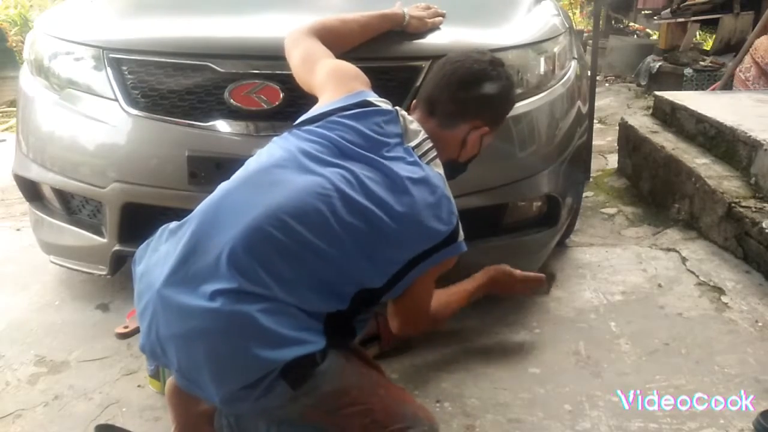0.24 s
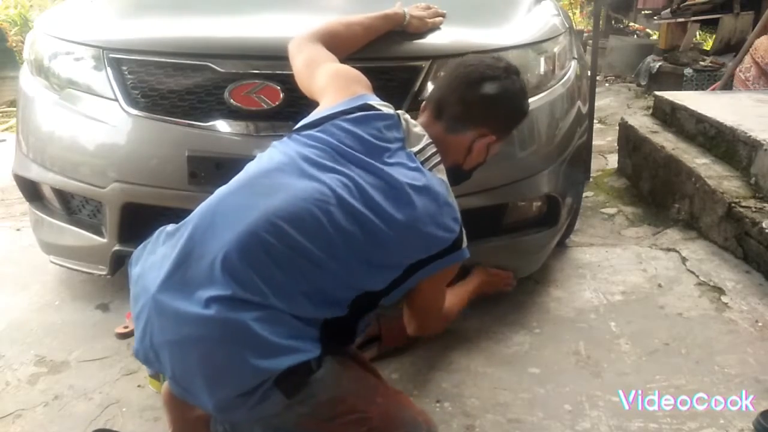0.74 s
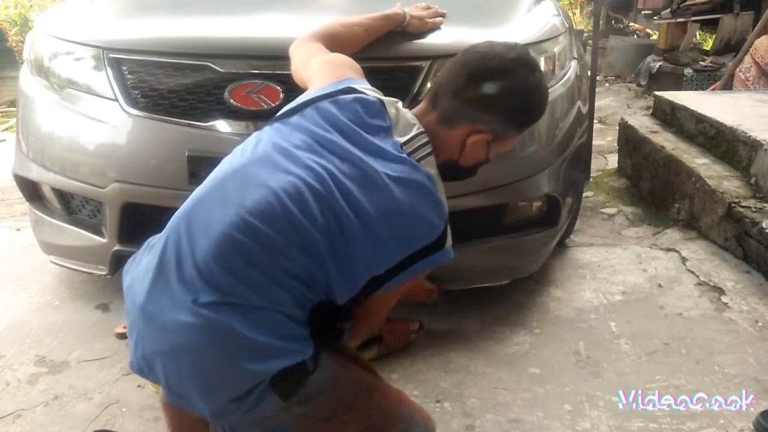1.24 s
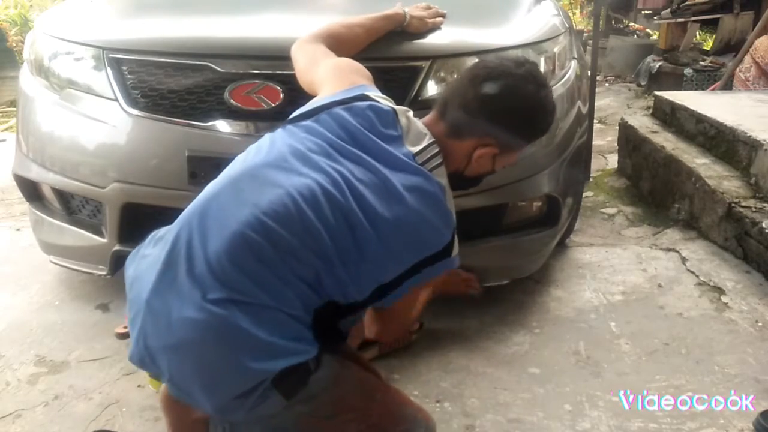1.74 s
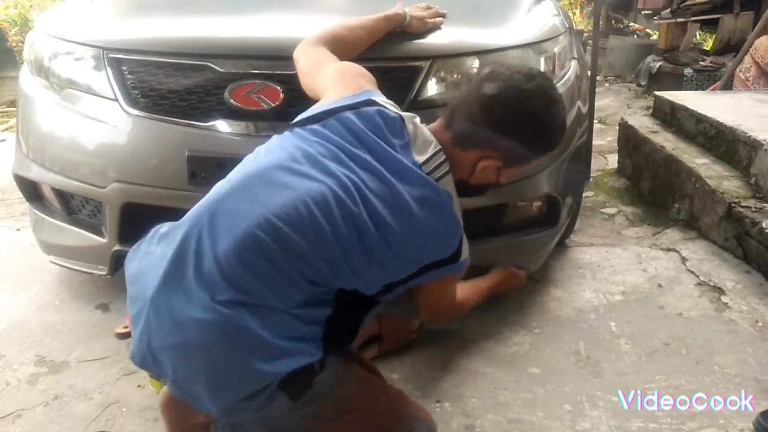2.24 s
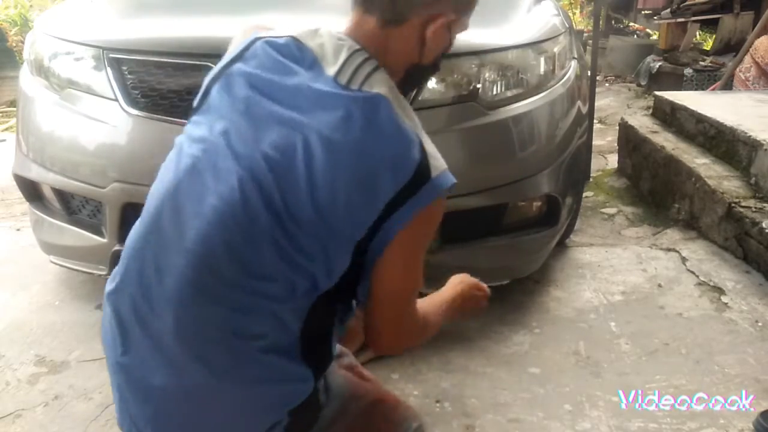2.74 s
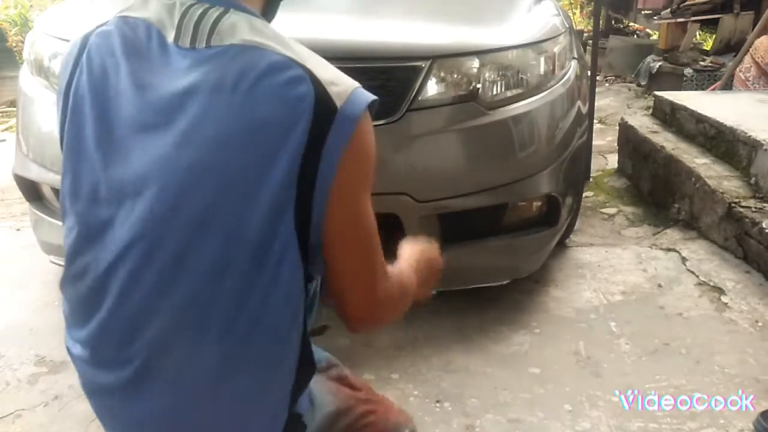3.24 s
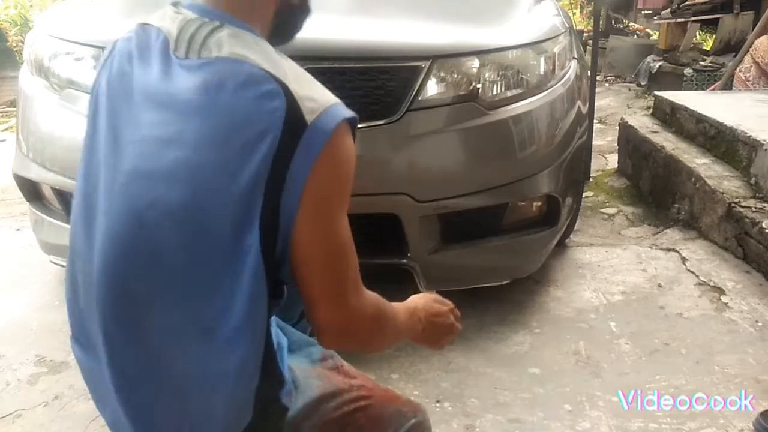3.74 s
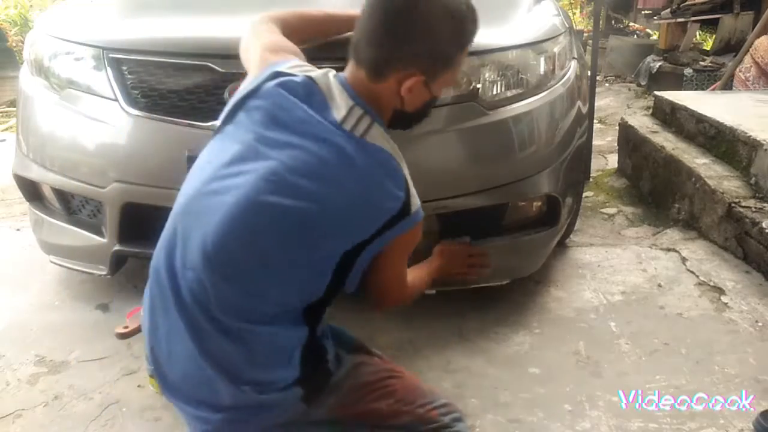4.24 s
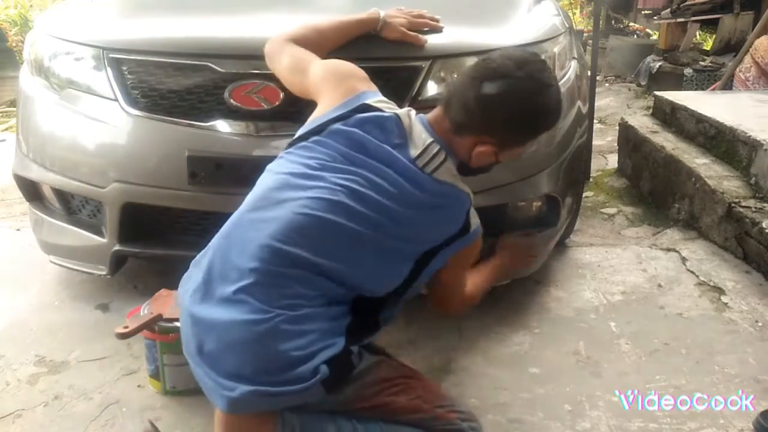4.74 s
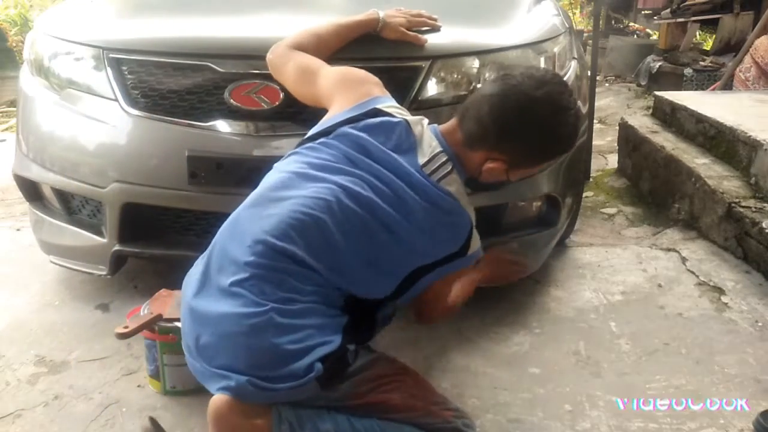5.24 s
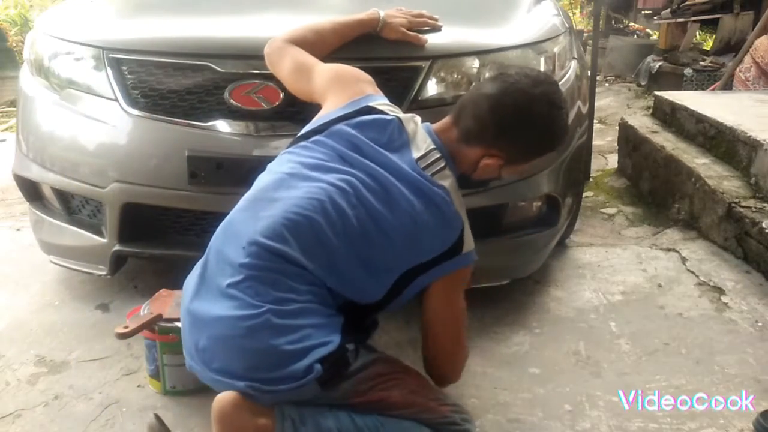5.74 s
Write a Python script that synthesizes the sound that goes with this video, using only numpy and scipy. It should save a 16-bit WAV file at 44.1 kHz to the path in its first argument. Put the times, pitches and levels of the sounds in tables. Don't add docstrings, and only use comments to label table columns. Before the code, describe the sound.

A hand sands a plastic bumper in gritty, rasping strokes, stops for almost a second, then resumes faintly with light taps in an open yard.

```python
import sys
import numpy as np
from scipy import signal
from scipy.fft import rfft, irfft, next_fast_len
from scipy.io import wavfile
from scipy.ndimage import uniform_filter1d

SR = 44100
rng = np.random.default_rng(int(sys.argv[2]) if len(sys.argv) > 2 else 0)


def output_pcm(signal):
    pcm = np.clip(np.atleast_2d(signal).T, -1, 1) * 32767
    wavfile.write(sys.argv[1], SR, np.round(pcm).astype(np.int16))


def natural_amplitude(level_db):
    exponent = np.asarray(level_db, float) / 20
    return 10 ** exponent


N = 264159

# (time [s], level [dB])
TRAFFIC = [(0, -71), (1.1, -72), (2.4, -69.5), (2.9, -86.5), (3.3, -76), (4.3, -72.5), (4.5, -63.5),
           (4.9, -75), (5.7, -78.5), (5.99, -64.5)]
# (frequency [Hz], density [dB per Hz])
RUMBLE = [(13, -40), (25, -10.5), (54, -4.5), (173, -9.5), (232, -16), (330, -17.5), (430, -60),
          (730, -120)]
# (frequency [Hz], density [dB per Hz])
YARD = [(280, -39), (480, -8), (930, -5.5), (1370, -6.5), (1700, -10.5), (3300, -32), (4290, -59.5),
        (7260, -120)]
# (time [s], deep drone level [dB], higher drone level [dB])
DRONES = [(0, -72, -64.5), (.45, -72, -67), (1.2, -69, -61.5), (1.55, -72, -77), (1.93, -62.5, -64),
          (2.198, -73.5, -77), (2.72, -62.5, -74.5), (3.3, -68.5, -69.5), (3.95, -74, -81),
          (4.4, -71.5, -79.5), (5.15, -75.5, -82), (5.4, -67.5, -71.5), (5.75, -82, -84), (5.99, -66, -68)]
DRONE_HZ = [64, 97]
# (start [s], length [s], level on gripping [dB], level on letting go [dB], weight on the shell [dB])
SKIDS = [(0.0, 0.0083, -57, -66, -11), (0.148, 0.06, -56.5, -56.5, -12), (0.513, 0.046, -48, -53, 6),
         (0.797, 0.075, -40, -40, -6), (1.268, 0.089, -45.5, -42.5, 5.5), (1.699, 0.12, -42, -41.5, -4),
         (3.283, 0.08, -93, -80, -3), (3.364, .07, -50.5, -63.5, -4.5), (3.802, 0.075, -66.5, -67.5, 6),
         (4.228, 0.093, -68, -73, -17), (4.322, .13, -44, -55.5, -8), (4.685, 0.011, -45, -48.5, -2),
         (5.175, 0.11, -74, -71.5, 15), (5.804, 0.078, -60.5, -67.5, 13.5)]
# (start [s], length [s], level on gripping [dB], level on letting go [dB], weight on the shell [dB])
STROKES = [(0.226, 0.015, -40, -44, -10.5), (0.636, 0.11, -49.5, -39.5, -6.5),
           (0.935, 0.17, -45.5, -35, -5), (1.158, 0.11, -40.5, -33.5, -6.5), (1.455, .03, -51, -46.5, 0),
           (1.475, .17, -39, -40.5, -7), (1.86, 0.12, -40.5, -37.5, -10.5),
           (2.048, 0.092, -46.5, -40.5, -7), (2.207, 0.14, -45.5, -39.5, -11),
           (2.429, 0.098, -51, -54.5, -10), (2.515, 0.11, -41, -32.5, -11.5), (3.15, 0.093, -91, -101, 13),
           (4.45, 0.21, -51, -53, -15), (4.82, 0.17, -60.5, -52.5, -19), (5.0, 0.1, -61.5, -73.5, -10),
           (5.205, 0.1, -57, -50, -5.5), (5.36, .19, -58.5, -53, -17), (5.87, 0.077, -58, -54, -15.5)]
# (time [s], change of dust hiss [dB], change of panel ring [dB])
CLOGGING = [(0, 0.5, -2.5), (.3, -1.5, -5), (.5, -7.5, 1.5), (1.0, 0, 1), (1.6, -1, 1.5), (2.2, 0.5, 1.5),
            (2.5, 3.5, -2), (3.3, -5.5, 3), (3.85, 1, -4.5), (4.3, -1, -1), (4.7, 0, -1.5), (5.1, 5, -2.5),
            (5.45, 1, -2.5), (5.75, -4, -2), (5.99, 3.5, 0.5)]
# (frequency [Hz], width [Hz], level [dB])
PAPER = [(3176, 370, -5), (3610, 510, 0), (3917, 393, 0.5), (4250, 253, 2.5), (4640, 482, -0.5),
         (4996, 343, 2.5), (5440, 1144, -6.5)]
# (frequency [Hz], width [Hz], level [dB])
BOOM = [(590.3, 58, -6.5), (737, 45, 2), (794, 76, -1), (906, 60, 0.5), (1040, 210, -5.5)]
# (frequency [Hz], width [Hz], level [dB])
PANEL = [(1132, 130, -3.5), (1239, 120, 4.5), (1373, 150, 2.5), (1535, 180, 4.5), (1670, 239, 3),
         (1756, 234, 3.5), (1930, 210, 2.5), (2083, 200, 3), (2300, 230, 0.5), (2529, 210, 1.5),
         (2822, 260, -2)]
# (frequency [Hz], density [dB per Hz])
DUST = [(3410, -20), (5800, -18.5), (7090, -16), (8100, -12), (9690, -17.5), (14100, -18)]
# (frequency [Hz], width [Hz], level [dB])
THUD = [(165, 26, -16.5), (290, 50, -7.5), (444, 24, -5.5)]
# (time [s], length [s], level [dB], frequency [Hz], width [Hz])
FLICKS = [(0.047, 0.055, -72, 1850, 900), (0.15, 0.018, -61.5, 3800, 420), (.41, .03, -81.5, 4500, 1500),
          (3.288, 0.057, -84.5, 3700, 650), (4.234, 0.08, -73, 3350, 270), (4.899, 0.086, -64, 2200, 220),
          (5.784, .016, -67.5, 650, 1200), (2.622, .018, -41.5, 1700, 1800),
          (3.353, 0.014, -64, 2500, 2200), (0.507, .008, -70, 2300, 2500), (4.308, .015, -59, 760, 870),
          (3.788, .01, -74, 1600, 3000), (5.52, 0.045, -61.5, 1550, 270)]
# (time [s], peak [dB], low ring [Hz], high ring [Hz], high ring level [dB])
KNOCKS = [(0.209, -36, 816, 1260, -3), (0.518, -30, 920, 1323, 25), (0.531, -27.5, 760, 1254, 0),
          (1.266, -26.5, 712, 1195, 1), (1.272, -14, 751, 1460, -13), (1.708, -32.5, 707, 1520, 7),
          (3.37, -37.5, 602, 1260, 6), (3.11, -64, 998, 1250, -6), (3.718, -59, 1034, 1290, -7.5),
          (3.795, -50, 1120, 900, -4), (4.06, -65, 1150, 1350, -2), (3.802, -38, 600, 1316, -4.5),
          (4.328, -32.5, 1034, 1260, 10), (4.342, -35, 1020, 1400, 6), (4.691, -34, 1090, 1178, 1),
          (4.71, -38.5, 1003, 1250, -4), (5.181, -52, 735, 1410, -11), (5.799, -45, 563, 1180, -2.5),
          (5.807, -29, 894, 1214, -1), (5.819, -28, 1053, 1415, -2), (5.844, -43, 732, 1450, -2)]
# (time [s], peak [dB], frequency [Hz], t60 [s], roughness [0 tone, 1 noise])
THUMPS = [(0.519, -57, 147, 0.14, 1), (.52, -54.5, 298, 0.38, 0.73), (1.411, -59, 162, 0.11, 0.86),
          (3.355, -54.5, 290, 0.11, 0.66), (3.793, -47, 323, 0.21, 0.33), (4.31, -58, 288, 0.52, 1.13),
          (4.329, -50.5, 167, 0.18, 0.66), (4.691, -54, 189, 0.19, 0.96), (4.721, -62, 290, 0.33, 1.05),
          (5.18, -54, 165, 0.45, 0.77), (5.26, -57.5, 266, 0.4, 0.85), (5.279, -59.5, 157, 0.22, 0.8),
          (5.804, -51.5, 293, 0.26, 0.38), (5.81, -46, 81, 0.44, 0.48)]
# (frequency [Hz], share of frames [0-1])
FILL_SHARE = [(4000, 0.046), (5000, .17), (6200, .42), (7400, 0.6), (9500, 0.71), (12000, 0.84),
              (14000, .66)]


def unit(x):
    return x / np.sqrt(np.mean(x ** 2))


def walk(rate_hz):
    at = np.arange(N) * rate_hz / SR
    levels = rng.standard_normal(int(at[-1]) + 2)
    k = at.astype(int)
    ease = (at - k) ** 2 * (3 - 2 * (at - k))
    return 1.216 * (levels[k] + ease * (levels[k + 1] - levels[k]))


def read(table):
    s, *columns = np.transpose(table)
    return [np.interp(np.arange(N) / SR, s, c) for c in columns]


def decay(t_s, t60_s):
    return np.exp(-np.log(1000) * t_s / t60_s)


def ring(x, hz, width_hz):
    return signal.lfilter(*signal.iirpeak(hz, hz / width_hz, SR), x)


def body(x, modes, roam_db=0.):
    out = 0
    for k, (hz, width_hz, db) in enumerate(modes):
        if roam_db:
            db = db + roam_db * walk(7)
        out = out + (-1) ** k * ring(x * natural_amplitude(db), hz, width_hz)
    return out


def colour(x, points):
    hz, db = np.transpose(points)
    size = next_fast_len(len(x))
    f = np.maximum(np.fft.rfftfreq(size, 1 / SR), 1)
    gain = natural_amplitude(np.interp(np.log(f), np.log(hz), db))
    return irfft(rfft(x, size) * gain, size)[:len(x)]


def shell_highpass(x, order):
    return signal.sosfilt(signal.butter(order, 560, "high", fs=SR, output="sos"), x)


def flicker(points, bands_hz, swell_db, flicker_db):
    base = colour(rng.standard_normal(N), points)
    out = 0
    for hz in bands_hz:
        out = out + ring(base, hz, hz / 3) * natural_amplitude(swell_db * walk(1.4) + flicker_db * walk(18))
    return unit(out)


def yard(drone_width_hz=12, mic_db=-91):
    bands_hz = 30 * 2 ** np.arange(0, 7.5, .5)
    traffic_db = read(TRAFFIC)[0]
    hiss_db = -77 + 0.3 * (traffic_db + 75)
    out = natural_amplitude(traffic_db) * flicker(RUMBLE, bands_hz[:8], swell_db=3.5, flicker_db=2.0)
    out += natural_amplitude(hiss_db) * flicker(YARD, bands_hz[7:], swell_db=.7, flicker_db=1.2)
    gust_db = 2.4 * walk(3.9)
    out *= natural_amplitude(gust_db / 2)
    for hz, db in zip(DRONE_HZ, read(DRONES)):
        phase = 2 * np.pi * np.cumsum(hz * (1 + .035 * walk(3))) / SR
        tone = np.sin(phase) * natural_amplitude(2 * walk(18) + gust_db)
        rough = ring(rng.standard_normal(N), hz, drone_width_hz)
        out += natural_amplitude(db) * unit(unit(tone) + 0.71 * unit(rough))
    return out + natural_amplitude(mic_db) * rng.standard_normal(N)


def grit(per_s, spread_db, patchy_db):
    when, size, sign = rng.random(N), rng.exponential(size=N), rng.standard_normal(N)
    return (when < per_s / SR) * sign * natural_amplitude(spread_db * size + patchy_db * walk(90))


def contact(age_s, stroke, grip_s, from_db):
    _, length_s, grip_db, go_db, weight_db = stroke
    let_go_db_per_s, dust_follow = 269.5, 0.65
    end_s = max(length_s, grip_s + 0.00087)
    rasp = np.interp(age_s, [0, grip_s, end_s], [grip_db + from_db, grip_db, go_db])
    rasp = rasp - let_go_db_per_s * np.maximum(age_s - length_s, 0)
    under = max(grip_db, go_db) - rasp
    boom = rasp + weight_db + 0.26 * under
    panel = rasp + 2.5 + 0.57 * weight_db + 0.18 * under
    dust = -55.5 + dust_follow * (rasp + 40) - 0.2 * weight_db
    dust = dust - (1 - dust_follow) * let_go_db_per_s * np.maximum(age_s - length_s - .1, 0)
    return [rasp, boom, panel, dust]


def hand(dust_lag_s=0.0063, thud_db=-22.5):
    t, power = np.arange(N) / SR, np.zeros((4, N))
    for table, grip_s, from_db in ((STROKES, .025, -11.5), (SKIDS, 0.007, -20.5)):
        for stroke in table:
            a = int(stroke[0] * SR)
            age_s = t[a:a + SR] - stroke[0]
            power[:, a:a + SR] += natural_amplitude(contact(age_s, stroke, grip_s, from_db)) ** 2
    dust_db, panel_db = read(CLOGGING)
    lag = np.exp(-1 / (dust_lag_s * SR))
    power[3] = signal.lfilter([1 - lag], [1, -lag], power[3]) * natural_amplitude(2 * dust_db)
    power[2] *= natural_amplitude(2 * panel_db)
    return np.sqrt(np.vstack([power, power[1] * natural_amplitude(2 * thud_db)]))


def sanding():
    coarse = grit(per_s=5000, spread_db=1.0, patchy_db=1.73)
    fine = grit(per_s=14000, spread_db=0.06, patchy_db=1.0)
    rasp = body(fine + .5 * coarse, PAPER, roam_db=0.3)
    boom = shell_highpass(body(coarse, BOOM, roam_db=1.8), 4)
    panel = body(coarse + 0.49 * fine, PANEL, roam_db=2.5)
    dust = colour(rng.standard_normal(N), DUST)
    thud = body(coarse, THUD)
    layers = np.array([unit(x) for x in (rasp, boom, panel, dust, thud)])
    return (layers * hand()).sum(axis=0)


def flicks(edge_s=.003, t60_s=.12):
    out, t = np.zeros(N + SR), np.arange(SR // 3) / SR
    for s, length_s, db, hz, width_hz in FLICKS:
        shape = np.minimum(t / edge_s, 1) * decay(np.maximum(t - length_s, 0), t60_s)
        scratch = rng.standard_normal(len(t)) * (rng.random(len(t)) < .2)
        note = unit(ring(ring(scratch, hz, width_hz), hz, 2 * width_hz))
        out[int(s * SR):][:len(t)] += natural_amplitude(db) * shape * note
    return out[:N]


def knocks(ring_t60_s=0.051, crack_db=10, shell_db=20, push_s=0.00032, rattle_s=.017):
    out, drive = np.zeros(N + SR), np.zeros(N + SR)
    t = np.arange(SR // 5) / SR
    fade = decay(t, ring_t60_s)
    for s, db, low_hz, high_hz, high_db in KNOCKS:
        rattle = rng.standard_normal(len(t)) * np.exp(-t / rattle_s) * (rng.random(len(t)) < .05)
        push = np.exp(-((t - 2 * push_s) / push_s * 2) ** 2)
        blow = 0.13 * (rattle + push)
        high = natural_amplitude(high_db) * np.sin(2 * np.pi * high_hz * t)
        spot = fade * (np.sin(2 * np.pi * low_hz * t) + high)
        hit = signal.fftconvolve(blow, spot)[:len(t)]
        i = int((s - .001) * SR)
        out[i:i + len(t)] += natural_amplitude(db) * hit / np.abs(hit).max()
        drive[i:i + len(t)] += natural_amplitude(db + high_db / 2) * blow
    shell = natural_amplitude(shell_db) * body(drive, BOOM[1:] + PANEL)
    crack = natural_amplitude(crack_db) * body(drive, PAPER)
    return shell_highpass(out + shell + crack, 7)[:N]


def thumps(rise_s=0.0024, spread=0.32):
    out, t = np.zeros(N + SR), np.arange(SR // 3) / SR
    for s, db, hz, t60_s, rough in THUMPS:
        shape = (1 - np.exp(-t / rise_s)) * decay(t, t60_s)
        noise = rng.standard_normal(len(t))
        rub = unit(ring(ring(noise, hz, spread * hz), hz, 2 * spread * hz))
        flex = (1 - rough) * np.sin(2 * np.pi * hz * t) + rough * rub
        out[int(s * SR):][:len(t)] += natural_amplitude(db) * shape / shape.max() * flex
    return out[:N]


def scene():
    near = sanding() + knocks() + flicks()
    t = np.arange(SR // 3) / SR
    tail = rng.standard_normal(len(t)) * decay(t, .25) * (t > .004)
    near += natural_amplitude(-14) * signal.fftconvolve(near, tail / np.sqrt(np.sum(tail ** 2)))[:N]
    sound = near + yard()
    sound -= 0.42 * ring(sound, 320, 92)
    return np.tile(sound + thumps(), (2, 1))


def low_pass(x):
    return signal.sosfilt(signal.butter(12, 15520, fs=SR, output="sos"), x)


def record(dry, band_hz=690, top_hz=14290):
    window = np.sqrt(signal.get_window("hann", 2048))
    frame = dict(fs=SR, window=window, nperseg=2048, noverlap=1024)
    f, _, z = signal.stft(dry, **frame)
    band = (f // band_hz).astype(int)
    mood = rng.standard_normal((band[-1] + 1, z.shape[2]))
    mood = uniform_filter1d(uniform_filter1d(mood, size=3, axis=0), size=2, axis=1)
    rank = mood.argsort(axis=1).argsort(axis=1) / z.shape[2]
    share = np.interp(band * band_hz, *np.transpose(FILL_SHARE), left=0)
    swap = rank[band] < share[:, None]
    power = np.sum(np.abs(z[0, f > 3000]) ** 2, axis=0)
    swap &= power < 20 * np.roll(power, 1)
    scrambled = z * np.exp(2j * np.pi * rng.random(z.shape))
    z = np.where(swap, scrambled, z) * (f < top_hz)[:, None]
    mix = signal.istft(z, **frame)[1][:, :N]
    return low_pass(mix)


dry = scene()
out = record(dry)
output_pcm(out)
```